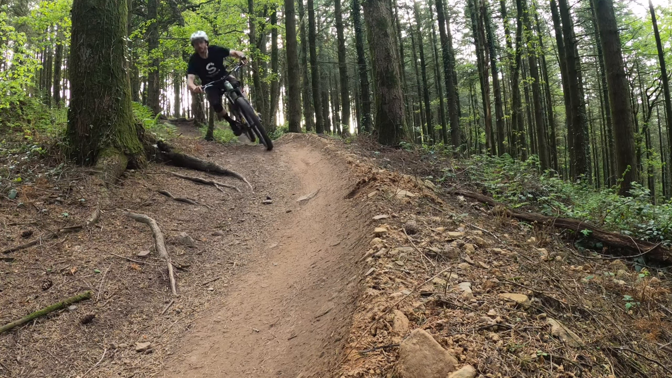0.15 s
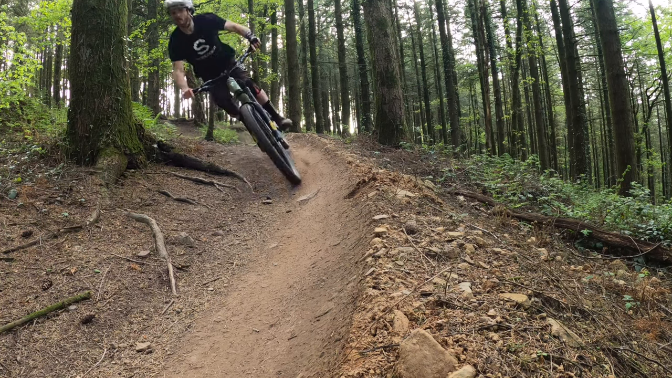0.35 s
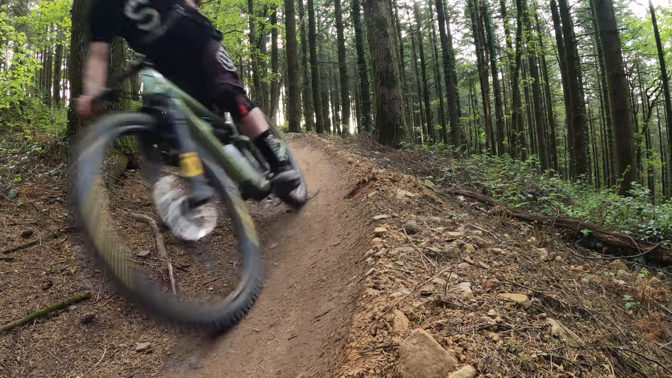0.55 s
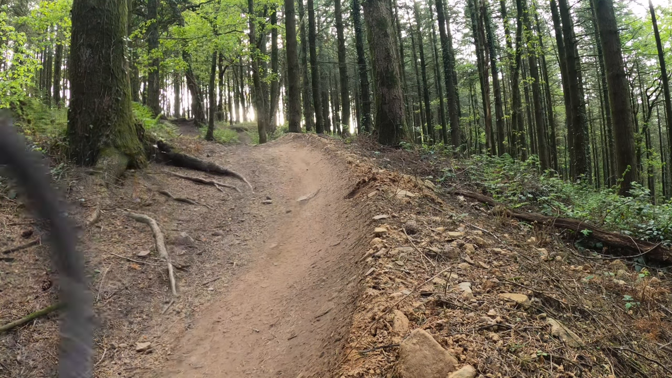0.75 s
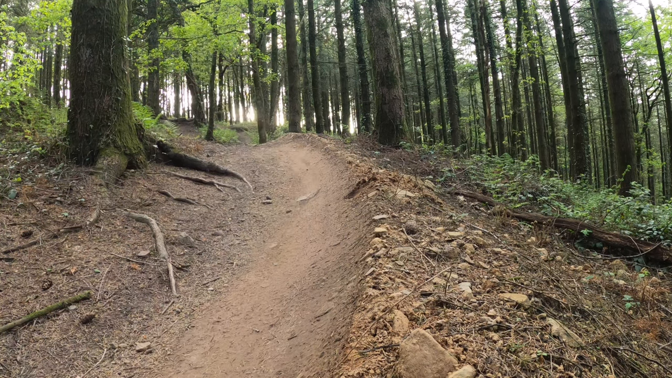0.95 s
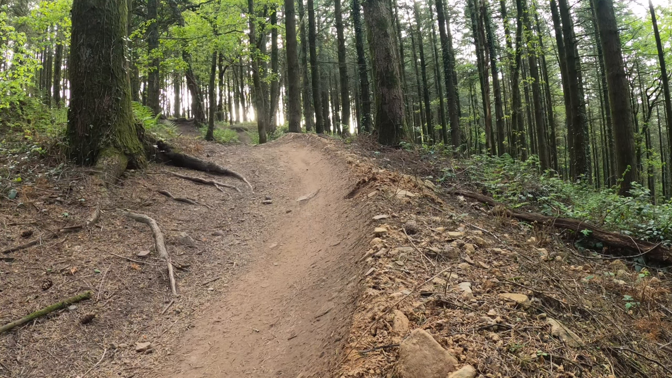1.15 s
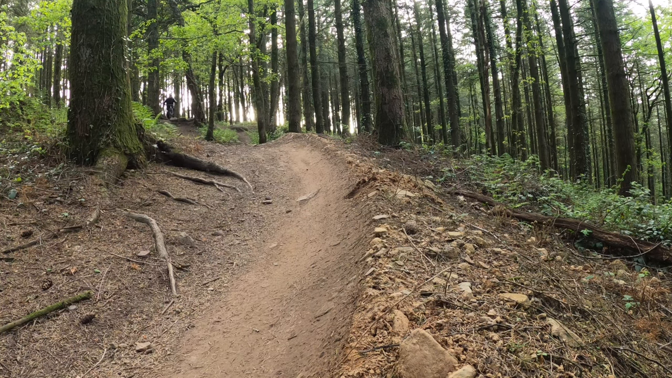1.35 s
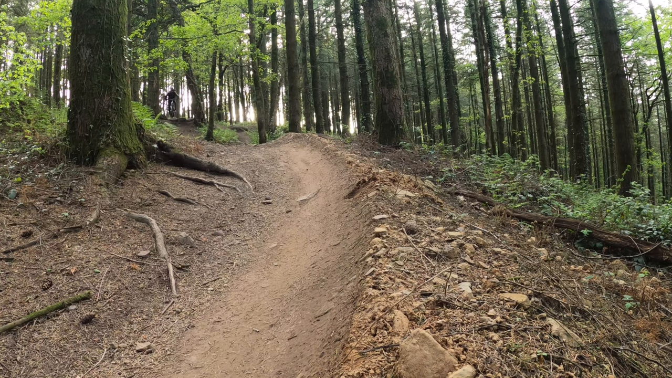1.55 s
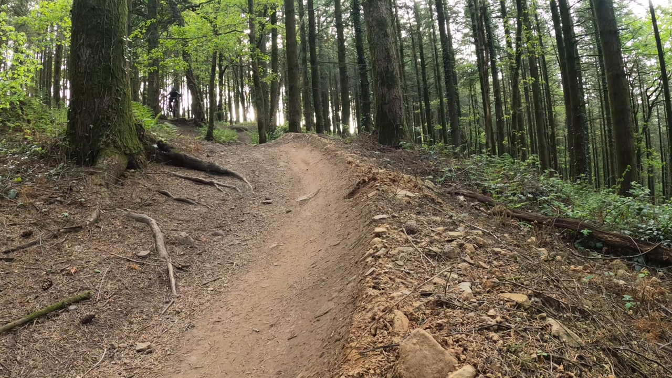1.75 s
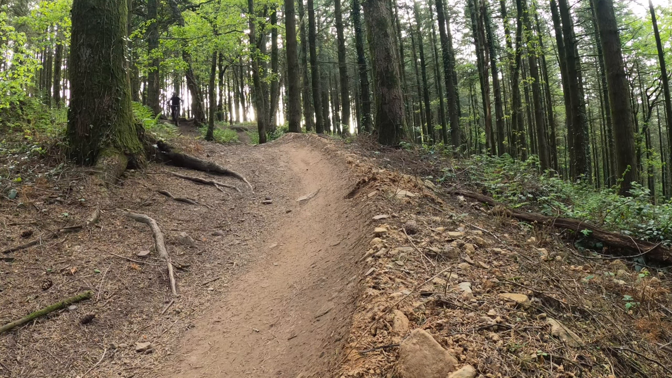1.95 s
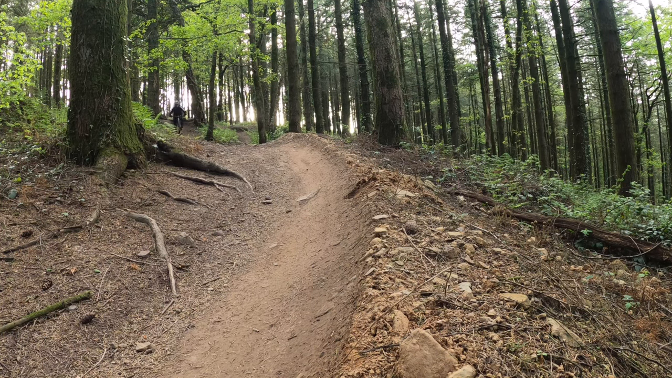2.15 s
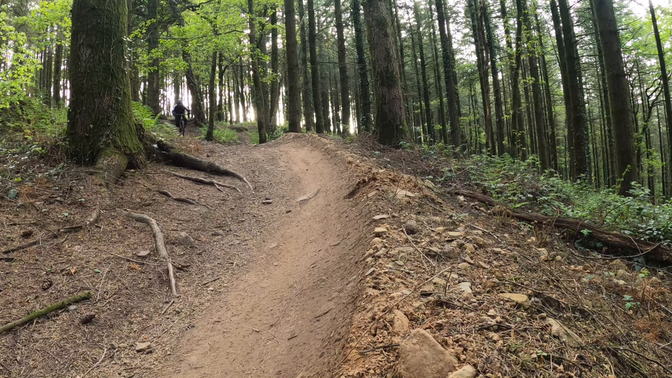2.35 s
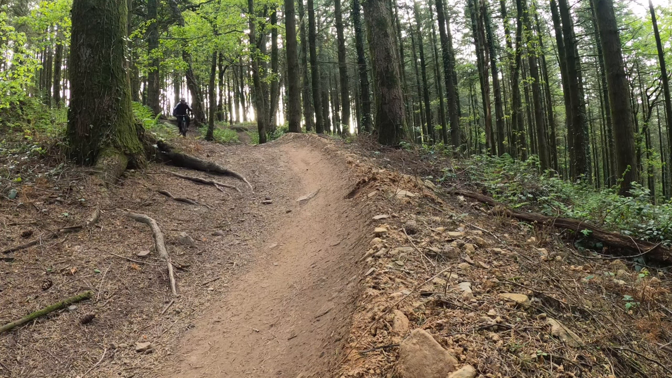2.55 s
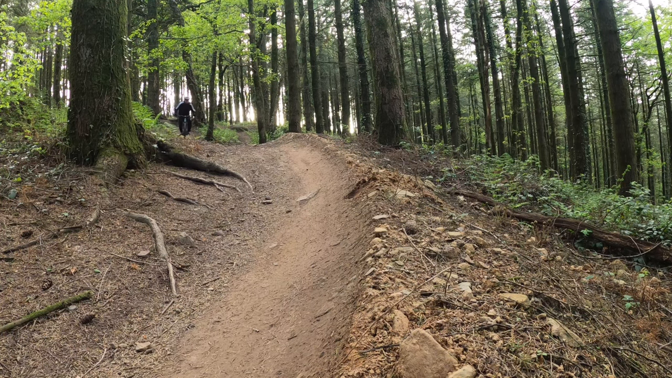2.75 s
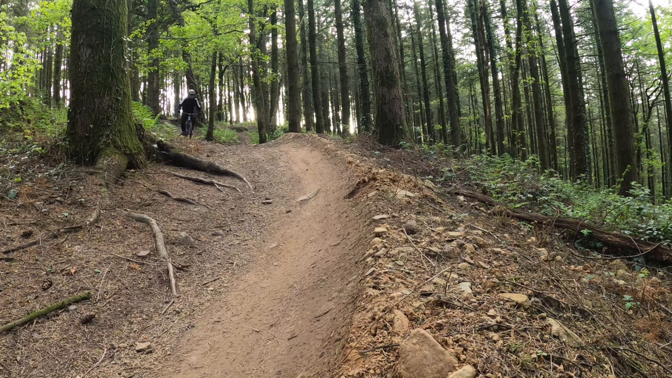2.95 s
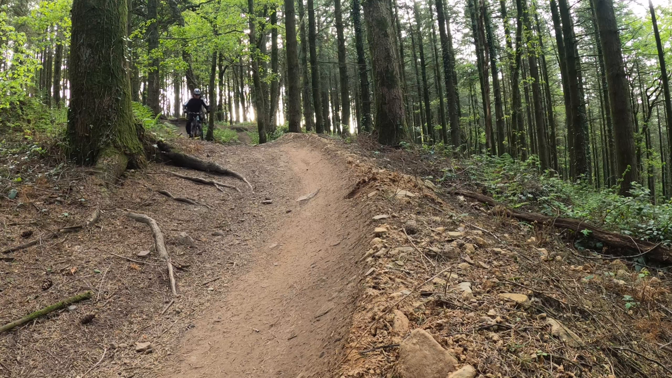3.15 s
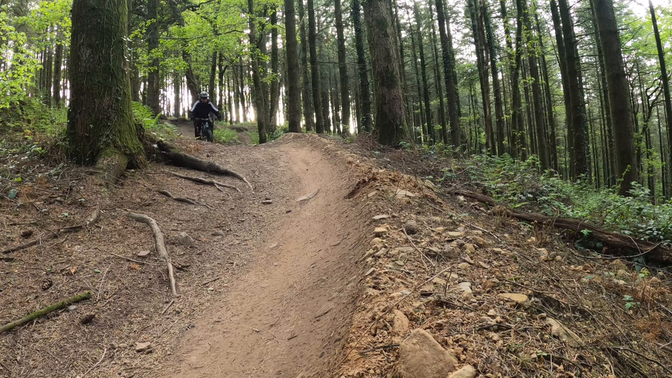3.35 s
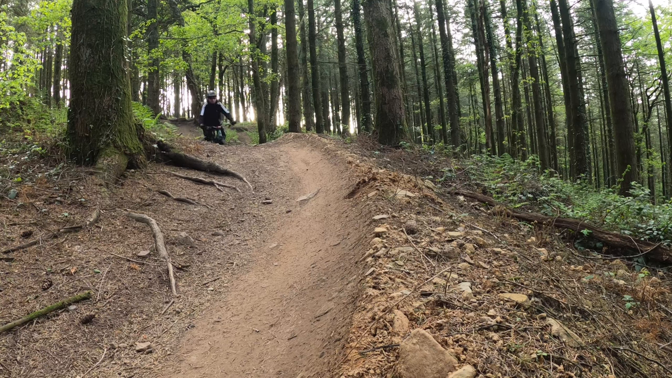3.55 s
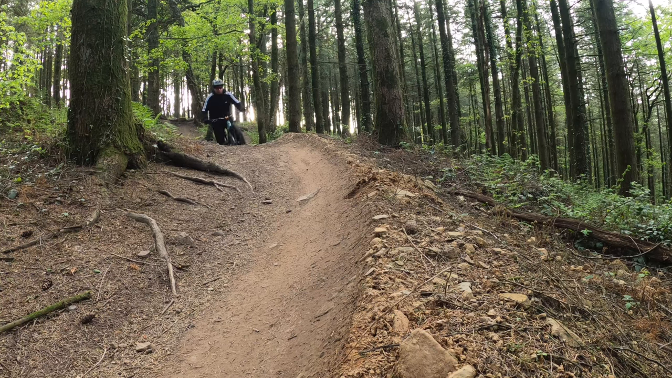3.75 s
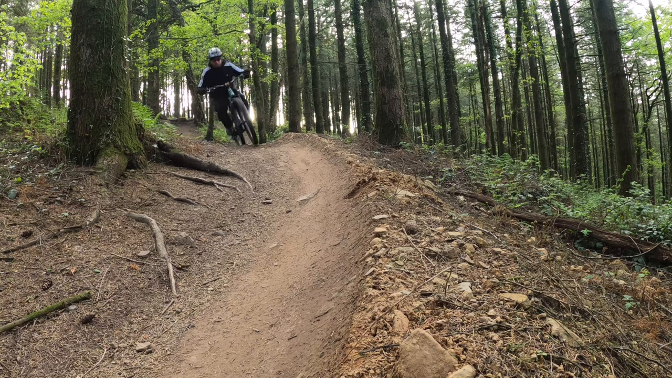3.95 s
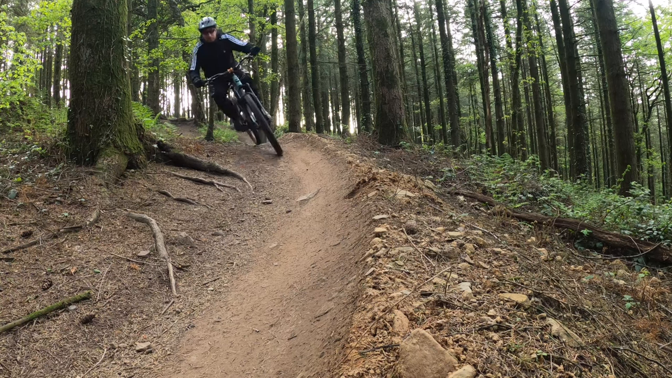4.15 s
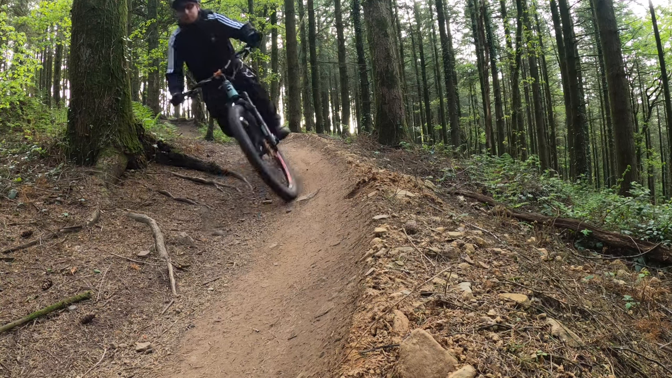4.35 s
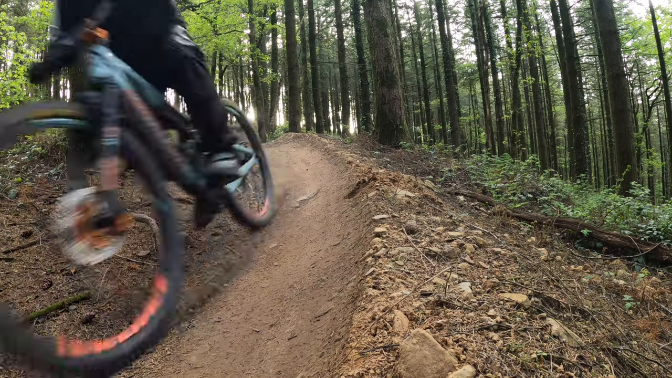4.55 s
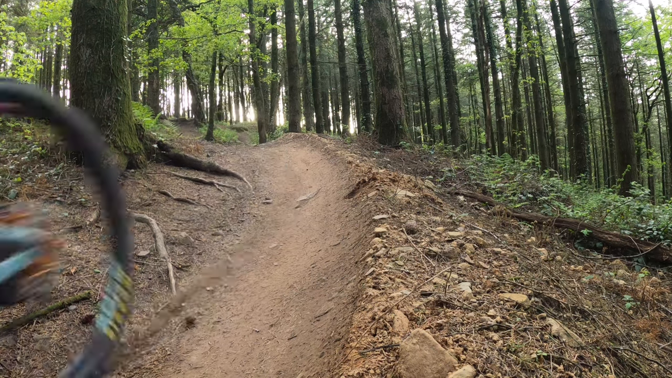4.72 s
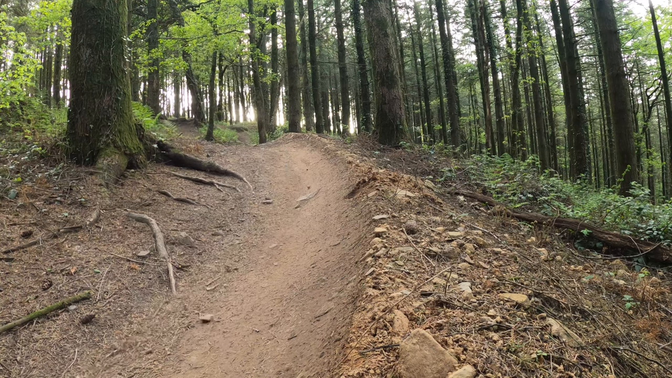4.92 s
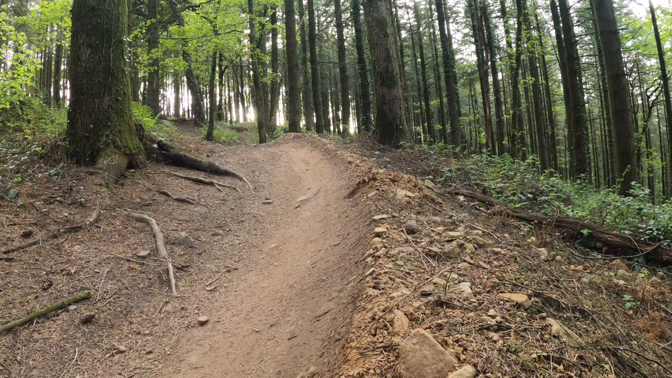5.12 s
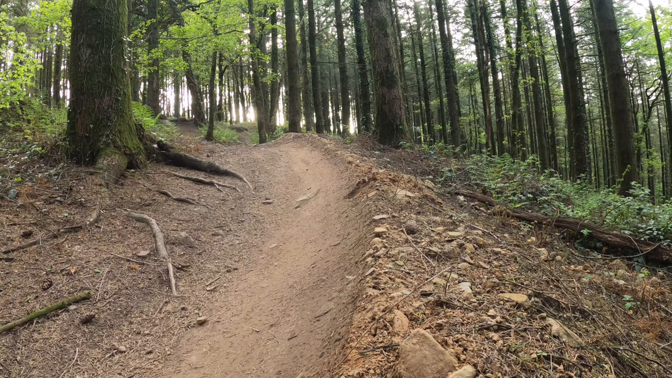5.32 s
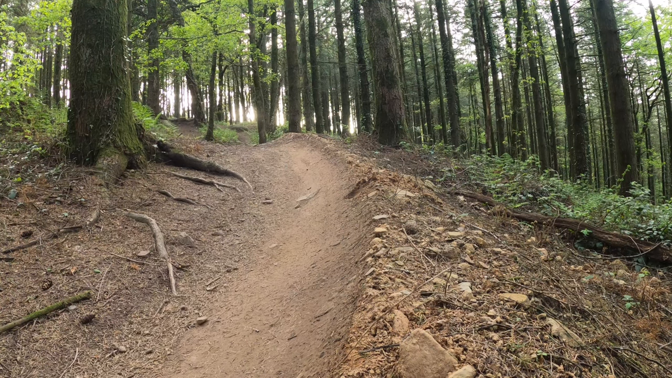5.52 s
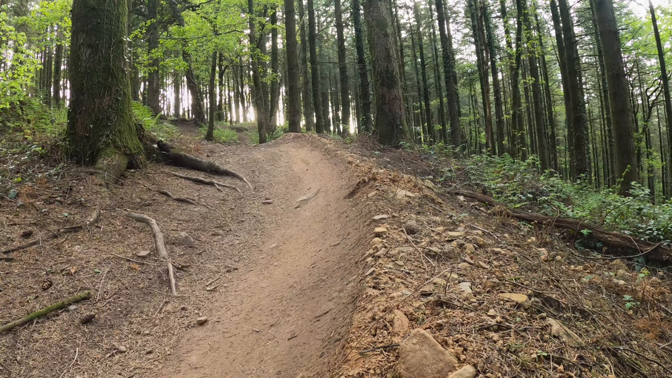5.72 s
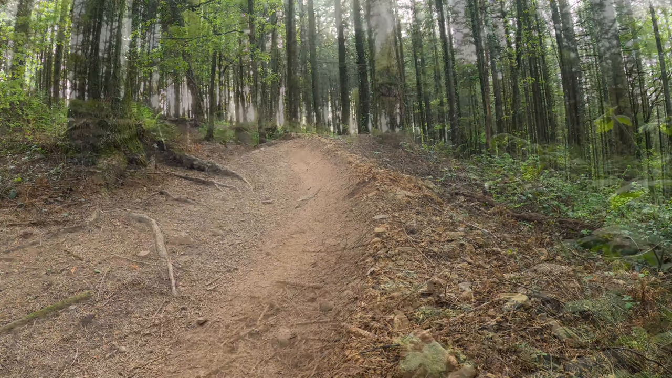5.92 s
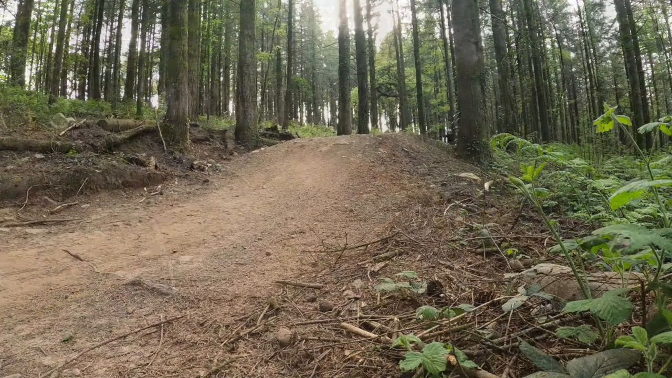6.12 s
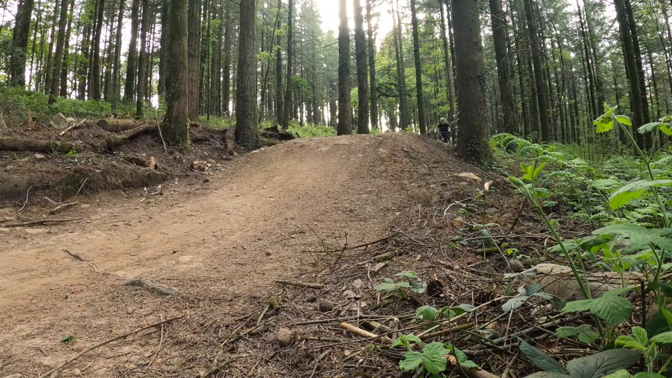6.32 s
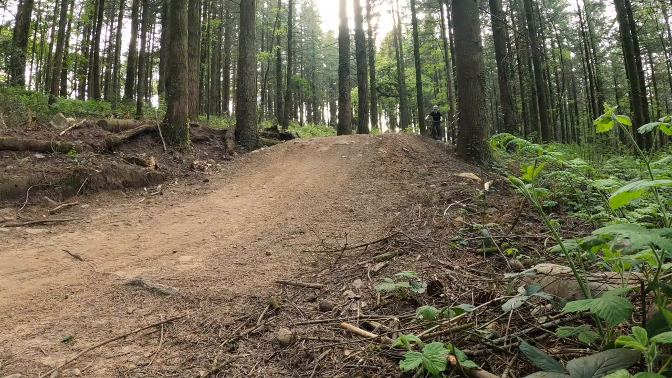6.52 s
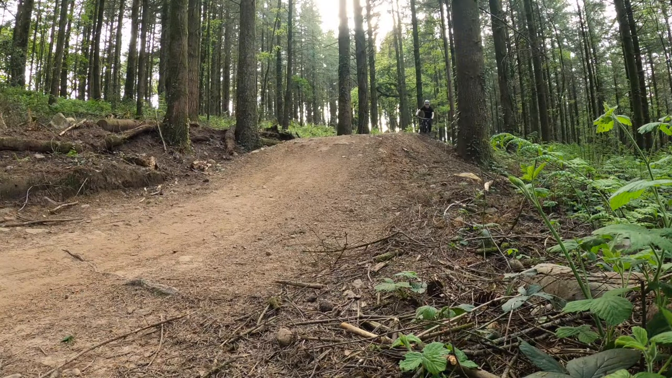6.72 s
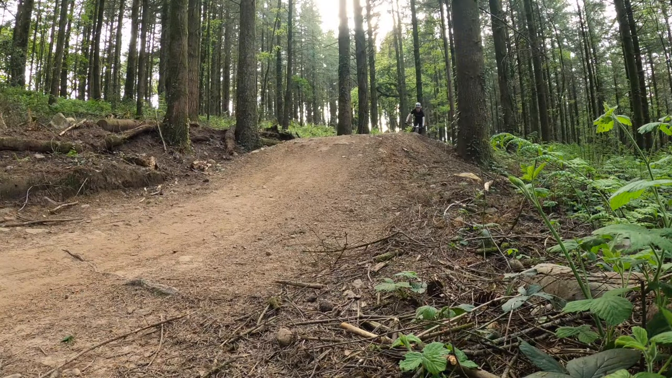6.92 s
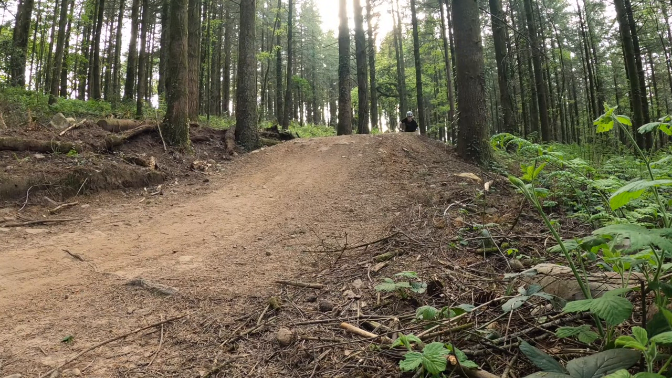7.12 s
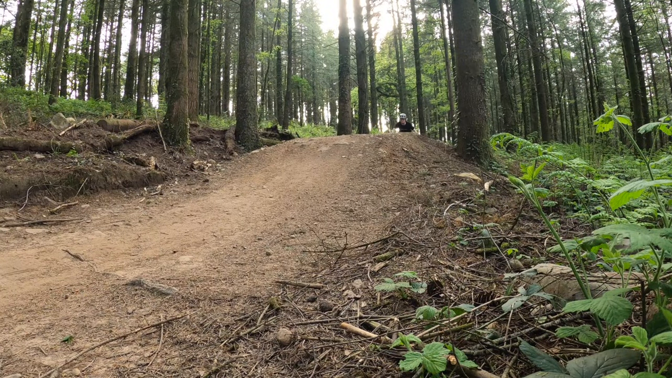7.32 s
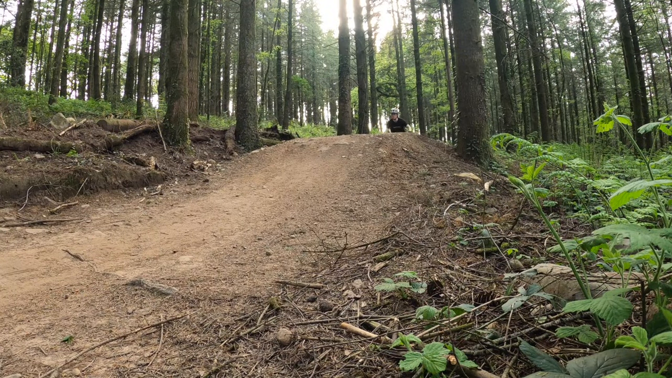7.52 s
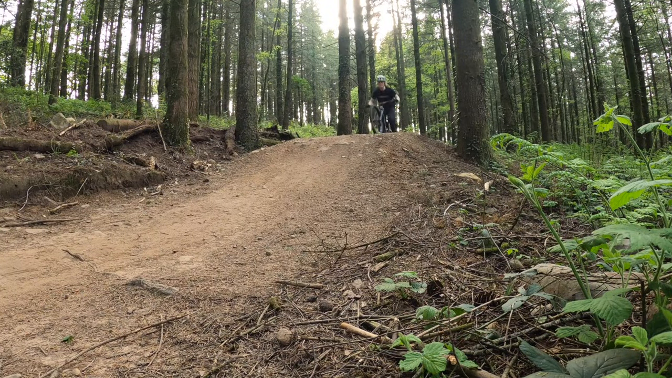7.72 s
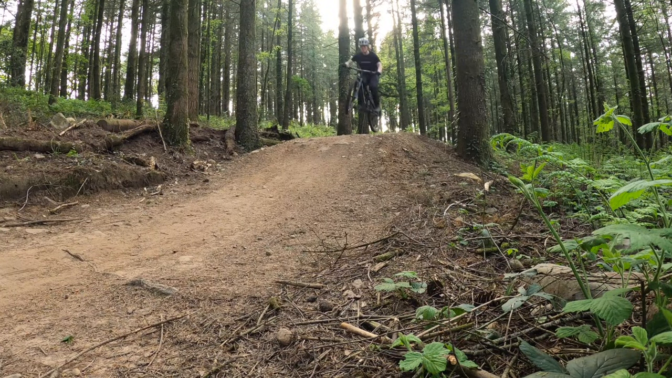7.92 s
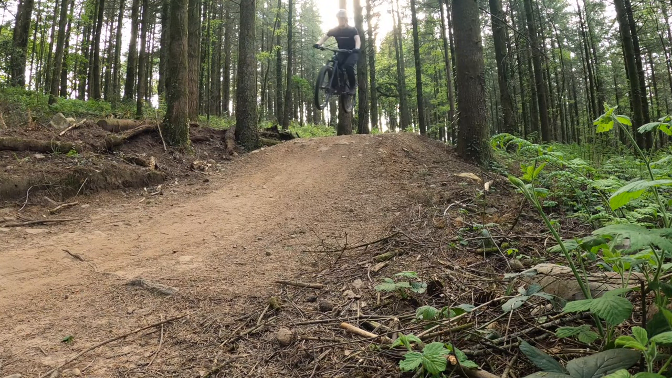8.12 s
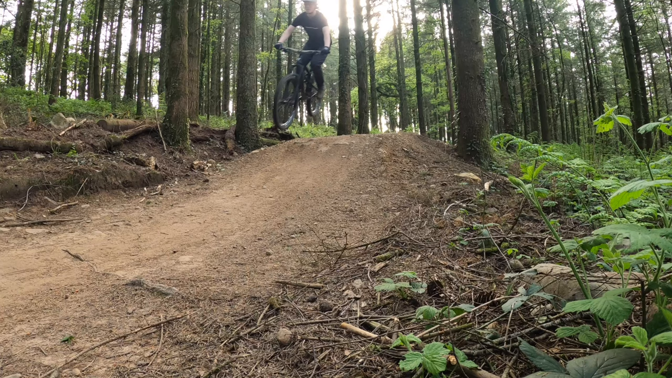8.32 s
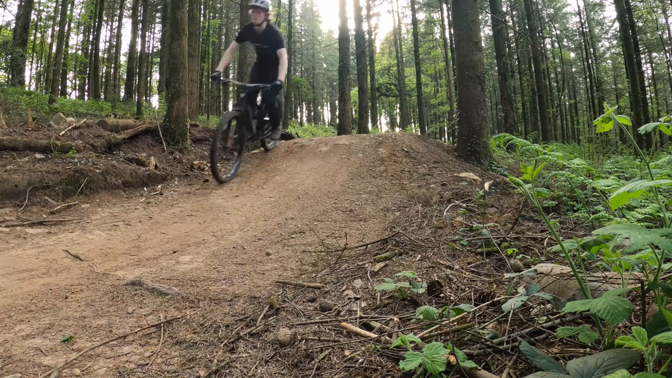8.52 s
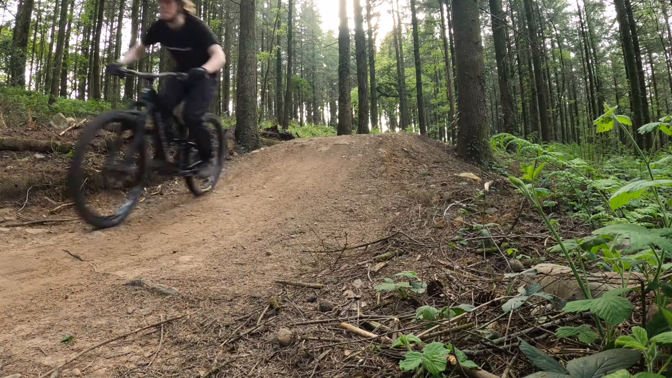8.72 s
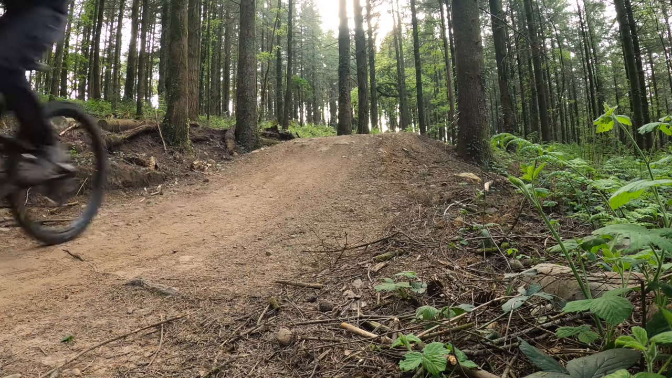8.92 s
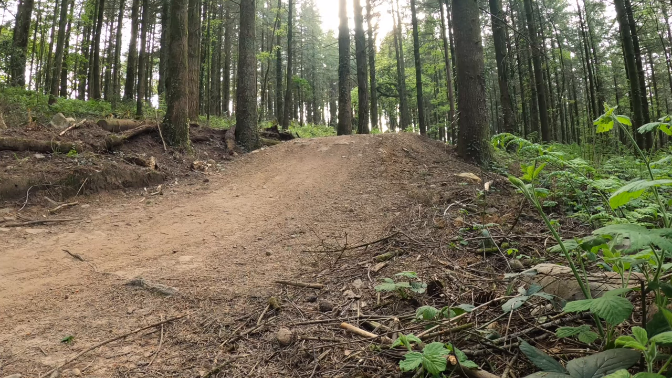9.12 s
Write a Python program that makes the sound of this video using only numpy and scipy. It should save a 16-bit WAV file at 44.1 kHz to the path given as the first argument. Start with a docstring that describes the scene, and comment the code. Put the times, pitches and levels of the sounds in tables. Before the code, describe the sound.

Knobbly tyres scrub and thud over forest dirt as three coasting bikes rush by in turn, their slipstream buffeting the microphone.

```python
"""Three mountain bikes ride down a forest dirt trail past a small stereo microphone. The first passes at 0.8 s:
knobbly tyres rumble, scrub and throw grit, wheels thud on roots, the chain ticks, the freewheel buzzes, and its
slipstream buffets the ports; all its sounds stop abruptly at 1.2 s. A far bird calls while the second
approaches; this bike passes at 4.8 s, and its wake gusts until about 6 s. The third passes at 8.9 s, and a
stone pings on a spoke. The forest keeps a faint hush throughout."""
import sys
import numpy as np
from scipy import signal
from scipy.io import wavfile
from scipy.ndimage import uniform_filter1d

SR = 44100
rng = np.random.default_rng(int(sys.argv[2]) if len(sys.argv) > 2 else 0)


def int16_out(signal):
    """Quantize to a 16-bit WAV file."""
    q = np.round(np.clip(np.atleast_2d(signal).T, -1, 1) * 32767)
    wavfile.write(sys.argv[1], SR, q.astype(np.int16))


N = 408895

# Spectra of soil rumble, tyre carcass, tread scrub and grit spray: freq_hz, density_db
RUMBLE_SPECTRUM = [(12, -37.5), (20, -14), (48, 14), (113, -4), (150, 0), (187, -5.5), (220, -5),
                   (290, -36.5), (480, -120)]
CARCASS_SPECTRUM = [(65, -40.5), (110, -2.5), (192, 7), (227, 6), (340, -1), (471, 1), (524, 1),
                    (713, -17.5), (1100, -28), (1430, -20), (2420, -120)]
SCRUB_SPECTRUM = [(350, -23.5), (600, 1), (718, -0.5), (1360, 9), (2600, -5), (3400, -7.5), (4200, -11.5),
                  (4920, -19.5)]
GRIT_SPECTRUM = [(2350, -29), (4000, -1.5), (4850, -0.5), (5600, -2.5), (7610, -4.5), (9130, -12),
                 (12300, -15.5), (15600, -28.5)]
def tyres(grit_db, pan_db, carcass_db, scrub_db, soil_cut_hz=4200):
    """Impact and friction: knobs pound the soil, slide over it and spray grit."""
    shake_db, spray_db = landings()
    distance_db = grit_db - grit_db.max()
    rumble_db = louder(carcass_db - 6.5 + 0.18 * distance_db, shake_db)
    carcass_db = louder(carcass_db, grit_db - 9.5)   # knobs whirr even in the air
    grit_db = louder(grit_db, spray_db)
    nearness = np.clip((scrub_db + 69) / 40, .2, 1)   # trees smear a far tyre smooth
    bumps_db = 2.7 * np.tanh((drift(65) + 0.16 * drift(10)) / 1.6) * nearness
    rumble = coloured(grains(300, 3.1, 0.56), RUMBLE_SPECTRUM, 0.7 * bumps_db, flicker_db=1.5)
    carcass = coloured(grains(700, 3.0, 0.69), CARCASS_SPECTRUM, bumps_db, flicker_db=1.5)
    scrub = coloured(grains(3500, 5.5, 0.56), SCRUB_SPECTRUM, 1.8 * bumps_db, flicker_db=2.5)
    grit = coloured(grains(5000, 0.94, 0.53), GRIT_SPECTRUM, 0.83 * bumps_db, flicker_db=2.5)
    # Air and trees dull far spray and scrub.
    grit += (from_db(0.063 * (grit_db + 47)) - 1) * band(grit, 9000, 19000)
    scrub += (from_db(0.079 * (scrub_db + 24.5)) - 1) * band(scrub, 1200, 8000)
    soil_absorption = signal.butter(6, soil_cut_hz, fs=SR, output="sos")
    rasp = signal.sosfilt(soil_absorption, scrub + from_db(-6) * pebbles())
    low = from_db(rumble_db) * rumble + from_db(carcass_db) * carcass
    high = from_db(scrub_db) * rasp + from_db(grit_db) * grit + dust_hiss()
    return placed(low, 0.13 * pan_db) + placed(high, 0.48 * pan_db)   # the housing shades treble more


# Rolling, one list per stretch on the ground: time_s, carcass_db, scrub_db
GROUND_STRETCHES = [
    [(0.0, -30.5, -36), (0.038, -38.5, -40.5), (0.102, -30, -36), (0.31, -47, -45.5)],
    [(0.33, -42, -32), (0.342, -44.5, -38.5), (0.4, -23, -29.5), (0.426, -31.5, -33.5),
     (0.462, -28.5, -29.5), (0.492, -24, -23), (0.506, -30.5, -37), (0.518, -22.5, -23), (0.6, -23, -22.5),
     (0.634, -22, -24), (0.648, -21.5, -23.5), (0.708, -24, -25.5), (0.798, -26, -30.5), (0.97, -42, -45.5),
     (1.124, -51, -51.5), (1.176, -34.5, -44.5), (1.214, -47, -53.5), (1.23, -87, -84.5)],
    [(1.48, -64, -83), (1.542, -61.5, -60.5), (1.75, -80, -76)],
    [(2.16, -55.5, -64), (2.186, -51.5, -47), (2.36, -58.5, -63.5), (2.49, -62.5, -73.5), (2.674, -63, -66),
     (2.95, -47.5, -64.5), (3.07, -57.5, -60.5), (3.15, -70, -85.5)],
    [(3.2, -62, -87.5), (3.282, -55, -72), (3.292, -46, -55.5), (3.44, -39.5, -56.5), (3.52, -46, -59.5),
     (3.65, -44.5, -60.5), (3.716, -41.5, -60.5), (3.738, -31, -47.5), (3.756, -37.5, -50),
     (3.866, -33, -45.5), (3.98, -43.5, -51.5), (4.004, -35, -44), (4.058, -40, -48), (4.1, -48, -57.5),
     (4.22, -53.5, -58)],
    [(4.245, -47.5, -46.5), (4.29, -46, -43), (4.3, -39, -31.5), (4.326, -36.5, -40), (4.429, -32.5, -32.5),
     (4.47, -28, -32), (4.548, -26, -28), (4.565, -26.5, -27.5), (4.652, -25, -31.5), (4.675, -24.5, -27),
     (4.72, -24.5, -31), (4.74, -20.5, -23), (4.785, -28, -34.5), (4.819, -19, -23.5), (4.836, -21, -31),
     (4.848, -21.5, -23), (4.864, -29, -38), (4.899, -23.5, -27.5), (4.919, -36, -43), (4.955, -30, -29),
     (4.999, -35.5, -44), (5.3, -43, -55.5)],
    [(5.32, -42, -55), (5.62, -46, -66), (5.72, -67, -69)],
    [(6.02, -59, -65), (6.096, -53, -62), (6.484, -53.5, -59.5), (6.6, -70, -70)],
    [(7.05, -48, -63.5), (7.234, -43, -58), (7.332, -51, -69), (7.344, -52.5, -65), (7.628, -43, -49),
     (7.786, -47, -59), (7.85, -56, -70.5)],
    [(8.565, -40, -42.5), (8.569, -39, -33), (8.705, -29, -37), (8.713, -31, -33.5), (8.915, -32.5, -33.5),
     (9.25, -37.5, -41.5)],
]
TOUCH_S, LIFT_S, AIRBORNE_DB = 0.0061, 0.15, -87
def contact():
    """Rolling noise needs contact: carcass level, scrub level, and 1 while the wheels are down."""
    rows = []
    touchdowns = [stretch[0][0] for stretch in GROUND_STRETCHES[1:]] + [N / SR + 1]
    for stretch, next_s in zip(GROUND_STRETCHES, touchdowns):
        rows += [(*row, 1) for row in stretch]
        flight_s = (stretch[-1][0] + LIFT_S, next_s - TOUCH_S)
        if flight_s[0] < flight_s[1]:
            rows += [(s, AIRBORNE_DB, AIRBORNE_DB, 0) for s in flight_s]
    return in_time(rows)


# Heavy compressions: start_s, hold_s, rumble_db, spray_db, fade_db_per_s
COMPRESSIONS = [(0.122, 0.015, -41, -47.5, 58), (0.385, 0.036, -32, -48, 202),
                (1.575, 0.014, -60, -76, 118.5), (2.163, 0.076, -33, -60, 201),
                (2.767, 0.12, -69, -70, 200), (2.985, 0.018, -57, -80, 188), (3.204, 0.089, -56, -80, 202),
                (3.293, 0.043, -40, -66, 75), (3.71, 0.21, -63, -67, 41.5), (4.01, 0.07, -45, -60, 250),
                (4.296, .03, -37.5, -54, 88), (4.653, 0.26, -30, -56, 143), (7.107, 0.033, -40, -71, 41),
                (7.492, 0.018, -43.5, -82, 198), (8.568, 0.032, -30, -47.5, 20),
                (8.78, 0.027, -33.5, -65, 67)]
def landings(rise_s=.015):
    """Impulsive loading shakes the soil and throws dirt; gives the level of each."""
    shakes, sprays = [], []
    for start, hold, rumble_db, spray_db, fade in COMPRESSIONS:
        envelope_db = swell(start, start + hold, rise_s, fade)
        shakes.append(rumble_db + envelope_db)
        sprays.append(spray_db + envelope_db)
    return louder(*shakes), louder(*sprays)


# Each bike is heard between two neighbouring entries: time_s
BIKE_BOUNDS = [0, 1.222, 5.96, 9.3]
# One row per bike: closest_s, grit_db, coming_scale_s, going_scale_s, final_pan_db
BIKE_PASSES = [(.82, -34.5, 0.15, 0.081, 27.5), (4.84, -40, 0.14, 0.11, 34), (8.88, -41, 0.13, 0.1, 17)]
def passing(swing_delay_s=0.078, swing_s=0.15):
    """Spreading loss: grit level falls with distance, and each bike pans left as it goes by."""
    t, grit_db, pan_db = np.arange(N) / SR, np.zeros(N), np.zeros(N)
    for start, end, bike in zip(BIKE_BOUNDS, BIKE_BOUNDS[1:], BIKE_PASSES):
        closest_s, peak_db, coming_s, going_s, final_pan_db = bike
        heard = (t >= start) & (t < end)
        past_s = t - closest_s
        coming_loss_db = 14 * np.log10(1 + (past_s / coming_s) ** 2)
        going_loss_db = 23.5 * np.log10(1 + (past_s / going_s) ** 2)
        grit_db += heard * (peak_db - np.where(past_s < 0, coming_loss_db, going_loss_db))
        pan_db += heard * final_pan_db * (1 + np.tanh((past_s - swing_delay_s) / swing_s)) / 2
    return grit_db, uniform_filter1d(pan_db, size=2000)


# Bands of the tyre noise: centre_hz, width_hz, [(time_s, share_removed)]; a negative share adds
TYRE_TONE_BANDS = [(906, 790, [(0, 0.48), (.35, 0.83), (.5, 0), (1.22, 0), (1.25, 1), (3.5, 0.74),
                   (3.62, 0), (4.05, 0.44), (4.1, 0.98), (4.23, 0.95), (4.26, 0), (4.4, 0)]),
                   (1360, 970, [(5.0, 0.35), (5.3, 0.28), (7.8, 0.97), (8.6, 0.92)]),
                   (724, 400, [(5.7, -0.43), (6.0, 0.51), (6.5, 0.73), (7.0, -1.06), (7.9, -1.53),
                   (8.55, -0.94), (8.9, -0.52), (9.05, -0.5)]), (5840, 390, [(1.2, 0.091), (1.3, 0.5),
                   (3.7, 0.88), (4.3, 0.14)]), (3450, 1200, [(.3, 0.65), (.47, -0.82), (.75, -0.5),
                   (.9, -0.12)]), (419, 85, [(.4, 0.24), (.52, -0.63), (.9, -0.74), (1.2, 0.24),
                   (1.3, -0.11), (6.0, 0.11), (6.1, -0.81), (6.6, -0.13), (7.0, 0.27), (7.45, 0.17),
                   (7.6, -0.52), (7.9, 0.14)]), (100, 81, [(4.1, 0.02), (4.35, -0.67), (4.9, -0.77),
                   (5.0, -0.19)]), (230, 99.6, [(.3, 0), (.45, 0.4), (1.2, 0.32), (1.7, 0.044)]),
                   (60, 77, [(8.63, 0), (8.66, 0.42), (8.79, 0.43), (8.81, 0), (8.85, 0.096),
                   (9.27, 0.42)]), (170, 82, [(6.1, 0.58), (6.3, 0.8), (7.9, 0.64), (8.6, 0.29),
                   (9.0, 0.51), (9.1, -0.73)])]
def tyre_tone(x):
    """Time-varying filtering: the tyre noise changes colour as chosen bands dip and swell."""
    for hz, width_hz, shares in TYRE_TONE_BANDS:
        in_band = signal.lfilter(*signal.iirpeak(hz, hz / width_hz, SR), x)
        x = x - np.clip(in_time(shares)[0], -2, 1) * in_band
    return x


# Wheel on a root or landing: start_s, level_db, pitch_hz, slap_db
WHEEL_BLOWS = [(0.105, -1, 289, -34), (0.328, -20, 243, -14), (0.373, -13, 228, -18),
               (0.394, -23, 217, -10), (0.512, -8.5, 305, -16.5), (1.527, -37.5, 308, -1),
               (2.16, -38.5, 218, -1), (2.592, -34.5, 215, -22), (2.89, -30, 414, -15),
               (2.97, -35, 420, -15), (3.215, -33, 250, -7), (3.291, -23.5, 496, -7.5),
               (3.381, -23, 450, -22), (3.442, -22, 322, -10), (3.633, -24, 268, -17),
               (3.679, -19.5, 444, -25), (3.733, -13, 559, -17), (3.85, -6, 271, -27),
               (4.002, -5, 309, -39), (4.249, -19.5, 328, 3), (4.297, -12.5, 253, -1.5),
               (4.669, -6.5, 592, 0.5), (4.81, 4.5, 476, -6.5), (7.055, -28, 240, -5),
               (7.116, -20, 542, -11), (8.566, -16, 380, 0.5), (8.601, -28, 253, -1), (8.97, -9.5, 267, -5)]
def thuds():
    """Damped resonance: a blow rings the air-filled carcass for a few cycles, and the tread slaps."""
    out, t = np.zeros((2, N)), np.arange(4000) / SR
    attack = np.minimum(t / 0.0029, 1)
    for start, level_db, hz, slap_db in WHEEL_BLOWS:
        noise = rng.standard_normal(len(t))
        ring = np.sin(2 * np.pi * hz * t) * np.exp(-t / 0.0075)
        thump = 0.14 * band(noise, 150, 670) * np.exp(-t / 0.0067)
        slap = from_db(slap_db + 3) * band(noise, 760, 4300) * np.exp(-t / 0.005)
        add(out, start, from_db(level_db - 10.5) * (ring + thump + slap) * attack)
    return out


# Stones crushed under a knob: start_s, level_db, centre_hz
STONE_CRACKS = [(0.043, -27, 1700), (0.126, -22, 704), (0.24, -27, 1680), (0.326, -22.5, 1210),
                (0.365, -17.5, 1100), (0.394, -18.5, 606), (0.475, -22, 1900), (0.482, -23.5, 1907),
                (0.535, -17, 1874), (0.566, -17, 1893), (0.591, -20.5, 1800), (0.488, -16.5, 1202),
                (0.514, -19, 1597), (0.648, -30, 2360), (0.677, -34, 2440), (0.711, -25, 1664),
                (0.753, -25.5, 2300), (0.935, -24.5, 1390), (0.969, -35, 2210), (0.988, -31, 1500),
                (1.035, -25.5, 1170), (1.127, -39.5, 1140), (1.161, -35.5, 1052), (3.634, -41, 1100),
                (3.693, -39, 900), (4.002, -29.5, 800), (3.735, -27.5, 690), (4.018, -32, 1170),
                (4.028, -43, 1324), (4.046, -36, 1200), (4.385, -18.5, 1560), (4.469, -17, 1860),
                (4.875, -16.5, 2600), (4.431, -19, 606), (4.434, -24, 2300), (4.789, -16, 2400),
                (2.52, -54, 1900), (2.639, -54, 1900), (4.574, -13, 1713), (4.593, -8, 815),
                (4.619, -12.5, 630), (4.67, -12, 597), (4.689, -11, 760), (4.734, -19, 1830),
                (4.758, -14, 661), (4.817, -15.5, 873), (4.844, -23, 813), (4.889, -17, 910),
                (4.942, -24, 1840), (4.955, -26, 1740), (5.185, -35.5, 650), (7.171, -40, 606),
                (7.238, -51.5, 604), (8.601, -17, 894), (8.72, -17.5, 807), (8.863, -17, 1530),
                (9.227, -28, 2316)]
def crunches():
    """Fracture: a stone cracks under the tread in a dull broadband transient."""
    out = np.zeros((2, N))
    for start, level_db, hz in STONE_CRACKS:
        add(out, start, from_db(level_db) * impact(0.4 * hz, 2.08 * hz, decay_s=0.003, width=0.23))
    return out


def pebbles(per_s=300, decay_s=.0012):
    """Shot noise: small stones snap at random under the tread."""
    snaps = (rng.random(N) < per_s / SR) * from_db(3.5 * np.minimum(rng.exponential(1, N), 2.2))
    envelope = signal.lfilter([1], [1, -np.exp(-1 / (decay_s * SR))], snaps)
    noise = rng.standard_normal(N) + 0.5 * rng.standard_normal((2, N))
    return rms_one(band(band(envelope * noise, 670, 3700), 470, 3800))


# Dust and spoke air, one list per bike: time_s, level_db
DUST_LEVELS = [
    [(0.45, -71), (0.682, -49), (0.838, -38), (0.912, -36), (1.038, -48.5), (1.158, -56), (1.225, -76)],
    [(4.3, -63), (4.41, -71), (4.578, -57), (4.712, -46), (4.838, -64), (5.092, -72), (5.4, -75)],
    [(7.85, -85.5), (7.992, -60), (8.15, -62), (8.32, -61.5), (8.538, -50), (8.72, -64), (8.842, -59),
     (9.092, -79), (9.27, -61)],
]
# Their spectrum: freq_hz, density_db
DUST_SPECTRUM = [(5000, -10), (7000, 2), (8500, 1.5), (10500, -1), (12300, -2.5), (14000, -10),
                 (15600, -20.5)]
def dust_hiss(fade_in_s=.04):
    """Broadband noise: fine dust off the wheels and air through the spokes merge in a bright hiss."""
    rows = []
    for bike in DUST_LEVELS:
        rows += [(bike[0][0] - fade_in_s, AIRBORNE_DB), *bike, (bike[-1][0] + TOUCH_S, AIRBORNE_DB)]
    hiss = coloured(grains(3000, 3.0, .5), DUST_SPECTRUM, 0, flicker_db=-2.5)
    return from_db(in_time(rows)[0] - 3.5) * hiss


def freewheel(levels, modes, clicks_per_s, grounded, doppler=1):
    """Forced vibration: pawls click unevenly over the ratchet and drive the modes of the hub shell."""
    start, end = round(levels[0][0] * SR), round(levels[-1][0] * SR)
    length = end - start
    teeth = np.cumsum(clicks_per_s * from_db(1.5 * drift(40)))[start:end] / SR
    clicks = (np.diff(np.floor(teeth), prepend=0) == 1) * from_db(3 * rng.standard_normal(length))
    drive = rms_one(clicks) + 0.94 * (rng.standard_normal((2, length)) + rng.standard_normal(length))
    level_db, treble_db = in_time(levels)
    unloaded_db = -8 * (1.5 - grounded)   # the lowest mode fades while the wheels are in the air
    out = np.zeros((2, N))
    for k, (hz, width_hz, mode_db) in enumerate(modes):
        heard_hz = doppler * hz
        ringing = band(drive, heard_hz - width_hz / 2, heard_hz + width_hz / 2)
        ringing = rms_one(band(ringing, heard_hz - width_hz, heard_hz + width_hz))
        flicker_db = 1.7 * drift(26) + .8 * drift(7.4)
        gain_db = mode_db + (k == 0) * unloaded_db + (hz > 3000) * treble_db + flicker_db
        out[:, start:end] += from_db(gain_db[start:end]) * ringing
    return from_db(level_db - 7.5) * out


# Coasting of the first bike, second coming, second leaving, third: time_s, level_db, treble_db
COASTING_LEVELS = [
    [(.55, -43, -4), (.704, -20.5, -20), (.76, -30, -5), (.86, -29, 3), (.92, -42.5, 6), (1.0, -49, -6),
     (1.215, -73, -2)],
    [(1.23, -100, 4), (1.49, -69.5, 1.5), (2.44, -68.5, 5), (3.1, -64, 1.5), (3.47, -55, -2),
     (3.62, -51.5, -10), (3.95, -52.5, -9), (4.1, -45, -7), (4.21, -43.5, 0), (4.43, -48, 6),
     (4.6, -39, 3.5), (4.8, -30, 0.5), (4.9, -33, -1)],
    [(4.9, -37.5, -12), (5.26, -64.5, -1.5), (5.654, -67, -6), (5.81, -69.5, -3), (5.98, -81, -9)],
    [(5.99, -69.5, -2), (6.24, -64, -1), (6.68, -64.5, -1), (6.74, -58, -2), (7.04, -57, -2),
     (7.25, -58.5, -3.5), (7.63, -60.5, -8), (7.99, -50, 0), (8.12, -48.5, 4), (8.2, -47.5, 5.5),
     (8.55, -37, 0.5), (8.62, -41, 0), (8.9, -35, -7), (9.0, -43.5, -12), (9.27, -47, -1)],
]
# Shell modes of each hub: pitch_hz, width_hz, level_db
FIRST_MODES = [(1680, 210, -0.5), (2300, 700, 5), (4100, 590, -8)]
SECOND_MODES = [(1310, 450, 0.5), (2625, 420, 1), (3364, 260, -6.5), (4636, 600, -2), (6600, 680, -13.5),
                (7660, 940, -14)]
THIRD_MODES = [(1457, 324, -1.5), (2356, 460, -5.5), (2400, 640, 4), (2600, 290, -0.5), (2830, 370, -9),
               (3870, 470, -6.5), (4330, 250, -1.5), (4550, 260, -7), (7190, 940, -14), (8470, 480, -17.5),
               (11880, 800, -19)]
# Pawl rate of each hub: clicks_per_s
PAWL_RATES = [300, 90, 300]
def hubs(grounded):
    """Three freewheels buzz; the Doppler effect lowers the second as it passes."""
    first, coming, leaving, third = COASTING_LEVELS
    return (freewheel(first, FIRST_MODES, PAWL_RATES[0], grounded)
            + freewheel(third, THIRD_MODES, PAWL_RATES[2], grounded)
            + freewheel(coming, SECOND_MODES, PAWL_RATES[1], grounded, doppler=1.011)
            + freewheel(leaving, SECOND_MODES, PAWL_RATES[1], grounded, doppler=0.936))


# Chain slap and flung grit: start_s, level_db, clack_db
FRAME_HITS = [(.0608, -33, 12), (.139, -24.5, 5.5), (.2289, -28, 4), (.3385, -28, -7), (0.403, -21, 0),
              (.451, -28, -9), (.513, -34, 0), (.53, -26, 4), (0.5649, -35, 12.5), (1.6476, -39, -0.5),
              (2.8034, -39, 1), (3.083, -38.5, 8), (3.292, -47, 3), (3.3129, -37, 5), (3.328, -39, -4),
              (3.5009, -35, 10.5), (3.8871, -21.5, 2), (4.0178, -34, -5), (4.2527, -31, 3),
              (4.301, -32, 14), (4.3455, -32, 16), (4.5141, -24.5, 3), (4.656, -30, 20), (4.6892, -26, 8),
              (4.9084, -14.5, -12), (5.142, -29.5, 9.5), (8.5736, -22, 12.5), (8.8533, -20, 6),
              (9.064, -22, 6.5), (9.1811, -25, 3)]
# Modes of the frame: pitch_hz, level_db
FRAME_MODES = [(2050, -6.5), (3000, -4), (3850, -9), (4600, -7), (5100, -8)]
def ticks():
    """Impact excitation: a bright snap sets the heavily damped modes of the frame clacking."""
    out = np.zeros((2, N))
    for start, level_db, clack_db in FRAME_HITS:
        tick = impact(4203, 10800, decay_s=0.0024, width=0.86)
        for hz, mode_db in FRAME_MODES:
            gain = from_db(clack_db - 10.5 + mode_db + 3 * rng.standard_normal())
            tick += gain * impact(hz / 1.06, hz * 1.06, decay_s=0.0072, width=0.6)
        add(out, start, from_db(level_db - 4.5) * tick)
    return placed(out, -2.1)


# Stone on a spoke: start_s, pitch_hz, level_db, t60_s
SPOKE_HITS = [(9.028, 3450, -29, .06), (9.06, 7400, -36, .03)]
def spoke_pings():
    """Free vibration: a struck spoke rings as an exponentially decaying sine."""
    out, t = np.zeros((2, N)), np.arange(3000) / SR
    for start, hz, level_db, t60_s in SPOKE_HITS:
        add(out, start, from_db(level_db - 60 * t / t60_s) * np.sin(2 * np.pi * hz * t))
    return out


# Eddies bursting on the ports: start_s, level_db, swing_hz, pan_db
EDDIES = [(1.05, -29.5, 110, 0), (1.173, -24.5, 129, 7.5), (5.409, -14, 109.3, -11.5),
          (5.477, -15, 170, -12), (5.492, -13, 261, -6), (5.51, -9.5, 170, -2), (5.538, -16, 230, -6),
          (5.568, -12.5, 307, -11), (5.6, -26, 130, -1), (5.643, -11, 197, -7.5), (5.694, -16, 219, -5),
          (5.718, -21, 230, -5), (5.746, -26, 119, -6), (5.824, -13, 200, -8), (5.991, -46, 199, -12),
          (6.071, -33, 198, -8)]
def gusts(half_length_cycles=0.42):
    """Vortex pressure: an eddy gives one quick swing, of random phase and sign at each port."""
    out, t = np.zeros((2, N)), np.arange(1600) / SR
    for start, level_db, hz, pan_db in EDDIES:
        cycles = hz * t - 1
        swing = np.cos(2 * np.pi * cycles + rng.uniform(-0.66, 1, (2, 1))) * rng.choice([-1, 1], (2, 1))
        attack = np.sin(np.pi / 2 * np.minimum(hz * t, 1)) ** 2
        envelope = attack * np.exp(-(cycles / half_length_cycles) ** 2)
        add(out, start, from_db(level_db) * placed(swing * envelope, pan_db))
    return out


# Slipstream on the ports: start_s, end_s, heave_db, flutter_db, pan_db
WAKE_SPANS = [(1.052, 1.177, -35, -51, 3), (4.996, 5.31, -47, -64, 1), (5.368, 5.414, -30.5, -47, -4),
              (5.476, 5.878, -25, -39, 5.5), (5.926, 6.083, -39.5, -61, 3)]
def slipstream(eddy_s=0.011):
    """A turbulent wake heaves and flutters on the ports, swelling briefly with each eddy."""
    heave, flutter = buffeting()
    eddies_db = louder(*[db + swell(s, s + eddy_s, 2 * eddy_s, 20 / eddy_s) for s, db, *_ in EDDIES])
    heave_db, flutter_db = eddies_db - 13.5, eddies_db - 8.5
    for k, (start, end, wake_heave_db, wake_flutter_db, _) in enumerate(WAKE_SPANS):
        envelope_db = swell(start, end, rise_s=0.11, fall_db_per_s=175)
        if k == 0:   # the first wake stops abruptly
            envelope_db[round(BIKE_BOUNDS[1] * SR):] = -200
        heave_db = louder(heave_db, wake_heave_db + envelope_db)
        flutter_db = louder(flutter_db, wake_flutter_db + envelope_db)
    pan_db = in_time(WAKE_SPANS)[-1]
    return placed(from_db(heave_db) * heave + from_db(flutter_db) * flutter, pan_db)


def buffeting():
    """Convected turbulence: eddies sweep each port at varying speed, as slow heave and quick flutter."""
    heaves, flutters = [], []
    for port in range(2):
        speed_db = 5 * drift(22)
        pressure = band(rng.standard_normal(N * 2), 32, 101)
        position = np.cumsum(from_db(speed_db)) % (N * 2 - 1)
        swept = np.interp(position, np.arange(N * 2), pressure) * from_db(0.24 * speed_db)
        heaves.append(rms_one(band(swept, 9.3, 168)))
        flutters.append(rms_one(band(band(swept, 128, 450), 88, 670)))
    return np.sqrt(2) * np.array(heaves), np.sqrt(2) * np.array(flutters)


# Far calls: start_s, end_s, from_hz, to_hz, level_db
BIRD_NOTES = [(2.03, 2.11, 5200, 4650, -68), (3.11, 3.19, 3170, 3160, -64), (3.21, 3.29, 3170, 3160, -64)]
def bird():
    """Frequency glide: each faint note is a falling pure tone."""
    out = np.zeros((2, N))
    for start, end, from_hz, to_hz, level_db in BIRD_NOTES:
        hz = np.linspace(from_hz, to_hz, round((end - start) * SR))
        tone = np.sin(2 * np.pi * np.cumsum(hz) / SR)
        add(out, start, from_db(level_db) * tone * np.hanning(len(hz)) ** .5)
    return out


# Hush of the forest: freq_hz, density_db
FOREST_SPECTRUM = [(18, -34), (30, -5.5), (80, -12), (181, 5), (917, -20), (1790, -5.5), (3400, -12.5),
                   (4630, -9.5), (5840, -15), (7950, -18.5), (9280, -37), (12600, -47.5), (14000, -43.5)]
def forest(level_db=-67.5):
    """Ambient noise: a faint hush whose bands flicker independently."""
    return from_db(level_db) * coloured(rng.standard_normal((2, N)), FOREST_SPECTRUM, 0, flicker_db=3)


# Likeness of left and right: freq_hz, correlation
COHERENCE = [(60, 0.98), (250, 0.97), (700, 0.83), (1500, 0.86), (2200, 1), (3500, 0.73), (6000, 0.5),
             (15000, 0.22)]
def coloured(drive, spectrum, bumps_db, flicker_db):
    """Spectral shaping in half octaves, mid and side: bumps shake all bands, each also flickers alone."""
    audible_hz = [hz for hz, db in spectrum if db > -60]
    octaves = np.log2(audible_hz[-1] / audible_hz[0])
    edges = audible_hz[0] * 2 ** np.arange(0, octaves + .5, .5)
    out = 0
    for k, (low, high) in enumerate(zip(edges, edges[1:])):
        mid, side = band(drive, low, high) * (-1) ** k
        hz = np.sqrt(low * high)
        alike = at_hz(COHERENCE, hz)
        gain = from_db(at_hz(spectrum, hz) + bumps_db + flicker_db * drift(22))
        out = out + gain * (np.sqrt(1 + alike) * mid + np.sqrt(1 - alike) * side * [[1], [-1]])
    return out / np.sqrt(np.mean(out.mean(0) ** 2))


def grains(per_s, spread_db, smooth):
    """Poisson contacts of uneven size over smooth noise, in two independent streams."""
    sizes = from_db(spread_db * np.minimum(rng.exponential(1, (2, N)), 3.5)) * rng.choice([-1, 1], (2, N))
    contacts = rms_one(sizes * (rng.random((2, N)) < per_s / SR))
    return rms_one(contacts + smooth * rng.standard_normal((2, N)))


def impact(low_hz, high_hz, decay_s, width):
    """Transient of a hard contact: a click and dying noise in one band, peak 1."""
    t = np.arange(1500) / SR
    noise = rng.standard_normal(len(t)) + width * rng.standard_normal((2, len(t)))
    noise[:, 0] += 6
    out = band(band(noise * np.exp(-t / decay_s), low_hz, high_hz), 0.4 * low_hz, high_hz)
    return out / np.abs(out).max()


def drift(rate_hz):
    """Slow fluctuation: low-passed noise of unit rms."""
    pole = np.exp(-80 * np.pi * rate_hz / SR)   # one step per 40 samples
    slow = signal.lfilter([1], [1, -2 * pole, pole * pole], rng.standard_normal(N // 40 + 2002))[2000:]
    return np.interp(np.arange(N) / 40, np.arange(len(slow)), rms_one(slow))


def swell(start, end, rise_s, fall_db_per_s):
    """Exponential attack, hold and release, in dB with top 0."""
    t = np.arange(N) / SR
    return -40 * np.maximum(start - t, 0) / rise_s - fall_db_per_s * np.maximum(t - end, 0)


def band(x, low_hz, high_hz):
    """Butterworth band-pass."""
    return signal.sosfilt(signal.butter(2, [low_hz, min(high_hz, .45 * SR)], "band", fs=SR, output="sos"), x)


def placed(x, pan_db):
    """Level-difference panning; positive is left."""
    return x * from_db(np.array([[.5], [-.5]]) * pan_db)


def add(out, start_s, sound):
    """Superpose a short mono or stereo sound."""
    i = round(start_s * SR)
    out[:, i:i + sound.shape[-1]] += sound[..., :N - i]


def louder(*levels_db):
    """Incoherent sources add in power."""
    return 10 * np.log10(sum(10 ** (db / 10) for db in levels_db))


def from_db(db):
    """Amplitude ratio of a level."""
    return 10 ** (np.asarray(db) / 20)


def rms_one(x):
    """Scale to unit rms."""
    return x / np.sqrt(np.mean(x ** 2) + 1e-20)


def in_time(rows):
    """Interpolate each column of a timed table at every sample."""
    times, *columns = np.transpose(rows)
    return [np.interp(np.arange(N) / SR, times, column) for column in columns]


def at_hz(spectrum, hz):
    """Interpolate a spectrum in log frequency."""
    freqs, values = np.transpose(spectrum)
    return np.interp(np.log(hz), np.log(freqs), values)


def scene():
    """Superposition: bikes, bird and forest, plus the wind pressure on the ports."""
    grit_db, pan_db = passing()
    carcass_db, scrub_db, grounded = contact()
    buzz = placed(hubs(grounded), pan_db)
    background = forest() + bird()
    rolling = tyre_tone(tyres(grit_db, pan_db, carcass_db, scrub_db))
    blows = thuds() + placed(crunches(), 0.89 * pan_db) + ticks() + spoke_pings()
    sound = rolling + blows + buzz + background
    sound[0] = np.roll(sound[0], 1)   # the left port lies a little further off
    return sound + slipstream() + gusts()


def record(dry):
    """Soft saturation rounds the peaks; a steep low-pass stops the treble above 16 kHz."""
    rounded = .65 * np.tanh(dry / .65)
    return signal.sosfilt(signal.cheby2(20, 70, 16000, fs=SR, output="sos"), rounded)


dry = scene()
out = record(dry)
int16_out(out)
```